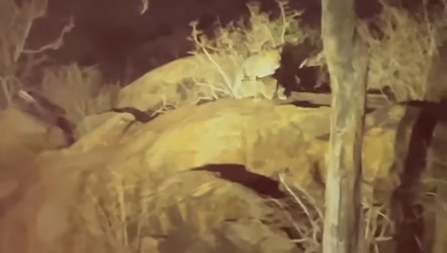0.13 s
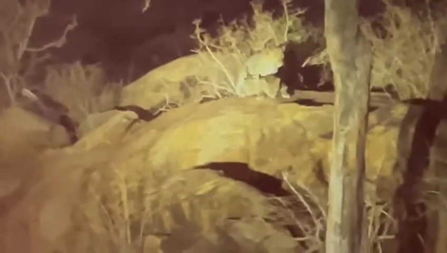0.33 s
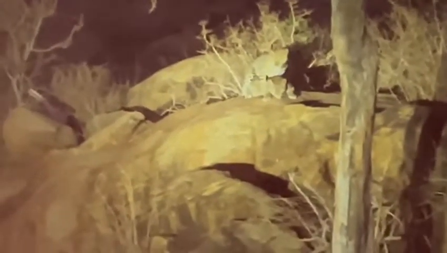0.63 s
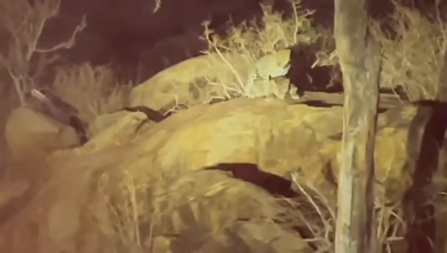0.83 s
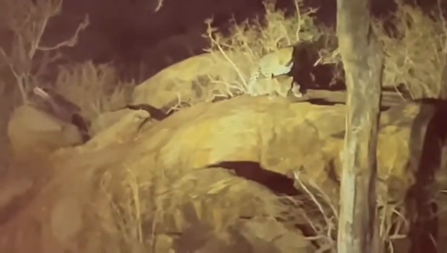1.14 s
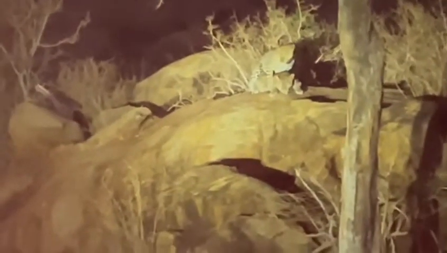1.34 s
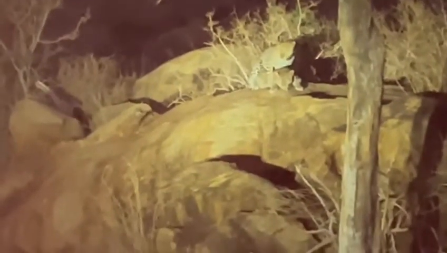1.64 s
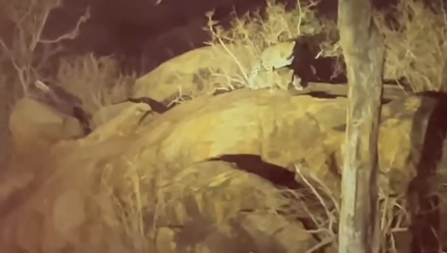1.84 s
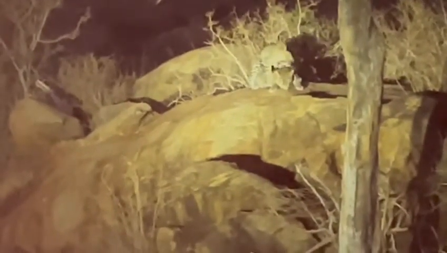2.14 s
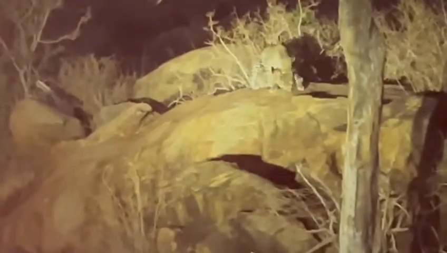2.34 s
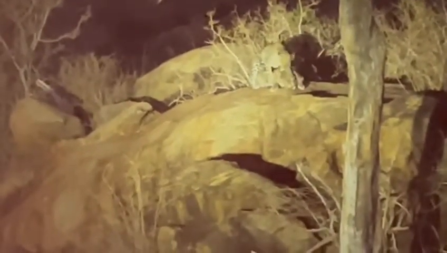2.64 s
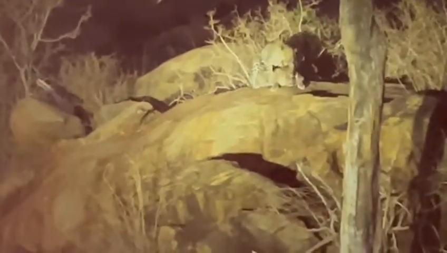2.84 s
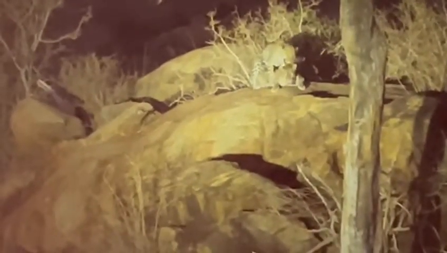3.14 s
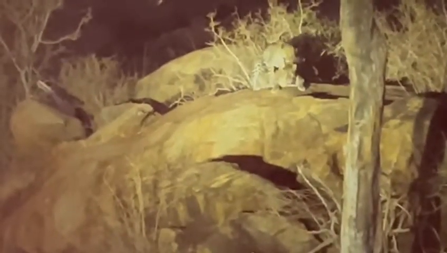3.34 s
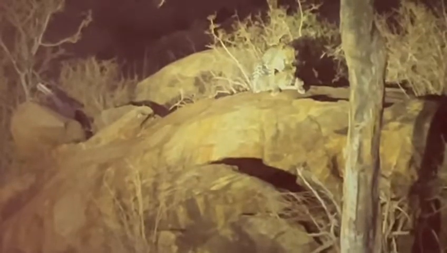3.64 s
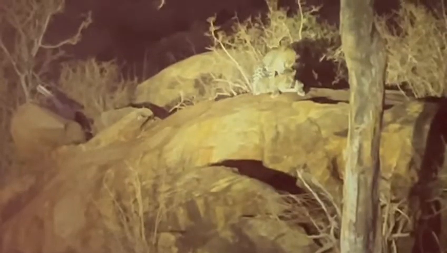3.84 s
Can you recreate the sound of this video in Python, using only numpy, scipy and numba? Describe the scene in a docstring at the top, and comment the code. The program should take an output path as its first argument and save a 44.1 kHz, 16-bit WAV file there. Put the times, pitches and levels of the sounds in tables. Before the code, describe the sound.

A big cat's low, rasping growl starts halfway through, over buffeting wind and soft night hiss.

```python
"""Night in the bush: wind buffets a hand-held camera microphone, a frog chorus throbs far off over soft hiss.
Wind is fluttering rumble plus short low noise bursts; frogs are pulsing noise bands, beside them a low murmur,
faint rustles and a whistled squeak. Halfway through a big cat some way off starts to growl: slow throat pulses
come in throbs and ring its mouth. At the top a thin band flickers on and off amid a wide hiss."""
import sys
import numpy as np
from scipy import signal
from scipy.fft import rfft, irfft
from scipy.io import wavfile
from scipy.ndimage import uniform_filter1d
from numba import njit

SR = 44100
rng = np.random.default_rng(int(sys.argv[2]) if len(sys.argv) > 2 else 0)


def bounce(signal):
    """Save signal as a 16-bit WAV file at the path given by the first command-line argument."""
    frames = np.transpose(np.atleast_2d(signal))
    limited = np.clip(frames, -1, 1)
    pcm = np.round(limited * 32767).astype(np.int16)
    wavfile.write(sys.argv[1], SR, pcm)


def boost(x):
    """Linear amplitude factor 10**(x/20) for a level x in decibels (scalar or array-like)."""
    u = np.asarray(x, float) / 20
    return 10 ** u


N = 176400
T = np.arange(N) / SR

# mouth of the cat: t/s, first resonance f/Hz, its resting width/Hz, mean pulse rate/Hz
MOUTH_SHAPE = [(2.19, 590, 55, 72), (2.24, 585, 65, 78), (2.32, 525, 72, 82), (2.45, 512, 75, 84),
               (2.53, 535, 70, 84), (2.64, 518, 78, 84), (2.74, 590, 70, 84), (2.9, 605, 65, 76),
               (3.2, 610, 65, 74), (3.4, 645, 55, 76), (3.7, 640, 60, 76), (4.0, 625, 62, 74)]


def unit(x):
    """Scale to rms 1."""
    return x / np.sqrt(np.mean(x ** 2) + 1e-18)


@njit
def svf(x, hz, width):
    """State-variable band-pass with moving centre and width, gain 1 at the centre."""
    y, b, l = np.empty(len(x)), 0., 0.
    for i in range(len(x)):
        g, k = np.tan(np.pi * hz[i] / SR), width[i] / hz[i]
        v = (b + g * (x[i] - l)) / (1 + g * (g + k))
        b, l, y[i] = 2 * v - b, l + 2 * g * v, k * v
    return y


def bandpass(x, hz, width_hz):
    """Band-pass with fixed or moving centre and width, gain 1 at the centre."""
    return svf(x, hz + 0 * T, width_hz + 0 * T)


def ring(x, hz, width_hz):
    """A resonance that answers a unit pulse with a unit swing."""
    return bandpass(x, hz, width_hz) * SR / (2 * np.pi * width_hz)


def cut(x, hz, kind, order=4):
    """Butterworth low or high pass."""
    return signal.sosfilt(signal.butter(order, hz, kind, fs=SR, output="sos"), x)


def band(hz, width_hz):
    """Noise through two equal resonances in a row, rms 1."""
    once = ring(rng.standard_normal(N), hz, width_hz)
    return unit(ring(once, hz, width_hz))


def along(table, column, x):
    """Read a table column by straight lines."""
    table = np.array(table, float)
    return np.interp(x, table[:, 0], table[:, column])


def shape(points):
    """dB at every FFT bin, by straight lines over log frequency."""
    points = np.array(points, float)
    bins_hz = np.arange(N // 2 + 1) * SR / N
    return np.interp(np.log(bins_hz + 1), np.log(points[:, 0]), points[:, 1])


def coloured(db):
    """Noise weighted by the given dB per bin."""
    return irfft(rfft(rng.standard_normal(N)) * boost(db), N)


def walk(rate):
    """Random levels held 1 / rate s and slewed twice; rms 1."""
    k = int(SR / rate)
    steps = np.repeat(rng.standard_normal(N // k + 1), k)
    return unit(uniform_filter1d(uniform_filter1d(steps, k), k)[:N])


def pair(mid, side):
    """Left and right from mid and side."""
    return np.array([mid + side, mid - side])


def flutter():
    """Wind rumble: low coloured noise follows the strength of the wind and flutters at random."""
    # wind strength: t/s, mean level/dB
    strength = [(0.0, -35.5), (0.6, -36.5), (0.76, -34.5), (0.99, -37.5), (1.66, -30.5), (1.82, -36.5),
                (2.02, -34.5), (2.7, -30.5), (3.12, -28), (3.39, -30.5), (3.69, -26.5), (4.0, -28)]
    # rumble spectrum: f/Hz, relative density/dB
    rumble = [(15, -60.5), (25, 6), (85, 6.5), (139, 1), (211, -2), (389, -8.5), (441, -21), (500, -12.5),
              (650, -9.5), (1100, -120)]
    return unit(coloured(shape(rumble))) * boost(along(strength, 1, T) + 3.54 * walk(18))


def buffet_bursts():
    """Buffets break on the microphone: each is a short low noise burst with an edge band that dies sooner."""
    # buffets: t/s, relative level/dB, edge against body/dB, time scale/s
    buffets = [(0.064, -25.5, -20, 0.065), (0.244, -15, -5, 0.041), (0.35, -14, -10.5, 0.04),
               (0.61, -20.5, -14, 0.066), (0.683, -6.5, -7.5, 0.021), (0.811, -24.5, -30, 0.036),
               (0.871, -20.5, -17, 0.024), (0.93, -26, -17, 0.05), (1.141, -18, 6, 0.056),
               (1.176, -12, 2, 0.038), (1.251, -8, -3, 0.04), (1.298, -20, -13, 0.058),
               (1.52, -21, -25, 0.026), (1.549, -19.5, -20, 0.025), (1.594, -19.5, -7, 0.03),
               (1.608, -12.5, -4.5, 0.022), (1.651, -15, -27, 0.02), (1.689, -12.5, -3.5, 0.032),
               (1.717, -19.5, -25, 0.043), (1.806, -19.5, 0, 0.038), (2.046, -23.5, -0.5, 0.029),
               (2.086, -18, -29, 0.019), (2.179, -22.5, -20, 0.043), (2.321, -16.5, -5.5, 0.036),
               (2.389, -17.5, -22, 0.027), (2.604, -9, -19, 0.027), (2.934, -11.5, -7.5, 0.049),
               (2.988, -9, -23, 0.031), (3.036, -12, -4, 0.031), (3.087, -16.5, 3, 0.039),
               (3.173, -10, -12, 0.022), (3.511, -15.5, -9, 0.039), (3.594, -7, -6, 0.025),
               (3.702, -9, -4.5, 0.026), (3.72, -8.5, -13, 0.055), (3.619, -9.5, -5.5, 0.023),
               (3.782, -21, 8.5, 0.039), (3.954, -28, 2, 0.031)]
    body, edge = np.zeros(N), np.zeros(N)
    for s, db, bright_db, scale in buffets:
        u = np.clip((T - s) / scale, 0, 30)
        bump = (u / .4 * np.exp(1 - u / 0.38)) ** 1.84
        body += boost(db - 7.5) * bump
        edge += boost(db - 7.5 + bright_db) * bump ** 2.1
    low = body * band(113.7, 159)
    bright = cut(band(347, 310), 620, "low", order=2)
    return low + edge * boost(1.46 * walk(70)) * bright


def wind():
    """Rumble and buffets in the middle; weaker, independent turbulence without the deepest bass at the sides."""
    mid = flutter() + buffet_bursts()
    side = boost(-5) * flutter() + boost(-12.5) * buffet_bursts()
    return pair(mid, cut(side, 85, "high", order=2))


def hiss():
    """Soft night air: steady coloured noise, with independent side noise for width."""
    # hiss spectrum: f/Hz, relative density/dB
    spectrum = [(180, -20), (300, 0.5), (462, -8), (644, -4.5), (1270, -11), (1870, -7.5), (2160, -12.5),
                (4130, -24), (5280, -27), (8620, -24), (9400, -29), (12200, -69), (20700, -120)]
    # stereo width: f/Hz, side against mid/dB
    width = [(300, -13), (1000, 1), (2050, -5), (2300, -31), (8300, -46), (20000, -53)]
    mid = coloured(shape(spectrum))
    gain = boost(-43) / np.std(mid)
    side = gain * coloured(shape(spectrum) + shape(width))
    return pair(gain * mid * boost(.6 * walk(25)), side)


def frogs():
    """Far-off chorus: wandering noise bands that pulse at the call rate."""
    # callers: f/Hz, width/Hz, pulse rate/Hz, nominal t of a pulse/s, relative level/dB
    callers = [(1784, 290, 28.97, .031, -51.5), (1921, 150, 28.97, .036, -52), (5230, 420, 30.8, .019, -67)]
    chorus = np.zeros(N)
    for hz, width_hz, rate, start, db in callers:
        phase = 2 * np.pi * rate * (T - start) + 0.1 * walk(7.85)
        beat = (0.56 + 0.3 * np.cos(phase)) ** 1.55
        call = band(hz * (1 + 0.021 * walk(9)), width_hz)
        chorus += call * beat * boost(db + 8 + 1.9 * walk(22))
    return pair(chorus, 0)


def murmur():
    """A low murmur: one narrow noise band of unsteady level."""
    return pair(band(645, 70) * boost(-57.5 + 1.5 * walk(12.6)), 0)


def flicker():
    """A thin noise band at the top wanders and shows only while a random gate is open."""
    gate = np.clip(4 * (walk(28) + .5), 0, 1)
    thin = band(11200 * (1 + .015 * walk(25)), 650)
    return pair(thin * boost(-70 + 4.0 * walk(5)) * gate, 0)


def sheen():
    """Wide top hiss: coloured noise of opposite sign left and right."""
    # sheen spectrum: f/Hz, relative density/dB
    spectrum = [(8700, -61), (9000, -14.5), (9500, -7), (10300, -3), (11000, -7), (11250, -24),
                (11600, -55.5)]
    return pair(0, boost(-60.5 + 1.0 * walk(10)) * unit(coloured(shape(spectrum))))


def rustles():
    """Faint rustles: broad noise bands that swell and fade over half a sine."""
    # rustles: t/s, length/s, f/Hz, width/Hz, level at the crest/dB
    strokes = [(0.617, 0.24, 4660, 3500, -52), (1.593, 0.16, 7540, 4500, -51),
               (1.62, 0.14, 3140, 1500, -50), (2.64, 0.21, 8750, 4000, -57), (2.978, 0.12, 8400, 3000, -53)]
    mid = np.zeros(N)
    for s, length, hz, width_hz, db in strokes:
        swell = np.sin(np.pi * np.clip((T - s) / length, 0, 1))
        mid += boost(db) * band(hz, width_hz) * swell
    return pair(mid, 0)


def squeak():
    """A faint whistled squeak: a gliding sine with a narrow band of air around it, a little to the left."""
    # glide: t/s, f/Hz, level of the tone/dB
    path = [(.648, 3000, -64), (.668, 3020, -54), (.69, 3280, -56), (.715, 3430, -53), (.74, 3380, -59),
            (.76, 3290, -53), (.795, 3100, -49), (.812, 3050, -64)]
    level = (T > path[0][0]) * (T < path[-1][0]) * boost(along(path, 2, T))
    glide = uniform_filter1d(along(path, 1, T), size=600)
    tone = np.sqrt(2) * np.sin(2 * np.pi * np.cumsum(glide) / SR)
    whistle = level * (tone + boost(1.5) * band(glide, 300))
    return pair(whistle, boost(-14) * whistle)


def throat_pulses():
    """Each throb restarts a run of up to eight uneven, fading pulses; returns throat and rasp pulse trains."""
    # throbs: t/s, relative rasp level/dB, relative throat level/dB, base fade per pulse/dB
    throbs = [(2.1945, -23, -23, -3.5), (2.2089, -26.5, -21, 1), (2.2692, -49, -25.5, 0),
              (2.3012, -46, -25, 2), (2.3406, -46, -27.5, -1), (2.3794, -34, -26, -1),
              (2.4409, -27, -20.5, 6), (2.4633, -35, -17.5, 1), (2.5024, -26, -19.5, 0.5),
              (2.5436, -26.5, -20.5, 3), (2.5794, -31, -19.5, 4), (2.6188, -28.5, -20, 5.5),
              (2.6604, -35, -22.5, 1), (2.6975, -22.5, -19, 1.5), (2.7351, -19.5, -17, 2.5),
              (2.7586, -20.5, -21, 2.5), (2.7824, -29.5, -26, -4.5), (2.8075, -17.5, -20, 0),
              (2.8195, -17.5, -21, 1.5), (2.8694, -18, -17, 7.5), (2.9068, -15.5, -15, 5.5),
              (2.9467, -15, -43, 2), (2.9961, -11.5, -15, 4.5), (3.035, -11.5, -15.5, 3),
              (3.0679, -12, -20.5, 2), (3.1168, -14.5, -20.5, 2), (3.1672, -26.5, -33.5, -5),
              (3.1974, -15, -22, 23), (3.2365, -17.5, -23.5, 5), (3.2665, -21.5, -25, 1),
              (3.2775, -20, -32, -5), (3.2864, -16.5, -28.5, 0), (3.3303, -18, -24, -1.5),
              (3.3568, -16.5, -17, 5.5), (3.3912, -16.5, -18, 2), (3.456, -20, -24.5, 2),
              (3.5054, -10.5, -17, 7), (3.5528, -19, -25.5, 4), (3.5793, -31, -22.5, 5),
              (3.6132, -17.5, -19.5, 5.5), (3.6651, -17.5, -20, 0.5), (3.7055, -22.5, -23, 1.5),
              (3.7449, -19.5, -25, 7), (3.7843, -20.5, -30, 0.5), (3.8531, -15, -18.5, 3.5),
              (3.917, -15, -18, 2.5), (3.9838, -16.5, -19, 2.5)]
    jitter, slip_cycles = .06, .12  # spread of the period (share), of the trigger (cycles of the ringing)
    throat, rasp = np.zeros(N), np.zeros(N)
    ends = [row[0] for row in throbs[1:]] + [N / SR]
    chance = rng.standard_normal((len(throbs), 8, 4))
    for (s, rasp_db, throat_db, fade_db), end, luck in zip(throbs, ends, chance):
        period, hz = 1 / along(MOUTH_SHAPE, 3, s), along(MOUTH_SHAPE, 1, s)
        for k, (late, low, high, slip) in enumerate(luck):
            if s > end - period / 2:
                break
            fall_db = fade_db * k + 5.5 * max(k - 2, 0) ** 2  # late pulses fade faster
            soft_db = -5 * (k == 0)  # the throat starts each throb softly
            throat[int(s * SR)] += boost(throat_db - fall_db + soft_db + 1.5 * low)
            rasp[int(s * SR)] += boost(rasp_db - fall_db + 2.0 * high)
            # the ringing throat triggers the next pulse roughly in step
            cycles = np.round(period * (1 + jitter * late) * hz)
            s += (cycles + slip_cycles * slip) / hz
    return throat, rasp


def airy(x, seconds, db):
    """Noise that follows every pulse and dies away."""
    puff = np.exp(-T[:SR // 8] / seconds)
    follow = signal.fftconvolve(x, puff)[:N]
    return boost(db) * follow * rng.standard_normal(N) / np.sqrt(np.sum(puff ** 2))


def mouth(throat):
    """Two moving resonances ring at the throat pulses; the first rings up slowly and chokes now and then."""
    # second resonance: t/s, f/Hz, relative level/dB
    second = [(2.19, 1310, -19.5), (2.33, 1020, -16), (2.5, 1017, -11.5), (2.62, 1113, -9),
              (2.74, 1060, -10), (2.9, 1004, -12), (3.4, 970, -15.5), (4.0, 1000, -11)]
    first_hz = along(MOUTH_SHAPE, 1, T) * (1 + .0125 * walk(40))
    choke = 1 + 1.2 * np.clip(walk(45), 0, 2)
    first_ring = ring(throat, first_hz, along(MOUTH_SHAPE, 2, T) * choke)
    low = bandpass(first_ring, first_hz, 115)  # the slow swell
    second_hz = along(second, 1, T)
    second_ring = bandpass(ring(throat, second_hz, 92), second_hz, 400)
    return low + boost(along(second, 2, T)) * second_ring


def snarl(rasp):
    """Lips drawn back: the rasp rings a bright edge that comes and goes."""
    # bright edge: t/s, relative level/dB
    edge = [(2.19, -13), (2.5, -12.5), (2.66, -4), (2.72, -5), (2.8, -6), (2.9, -13.5), (3.05, -19.5),
            (4.0, -13)]
    # its resonances: f/Hz, width/Hz, relative level/dB
    rings = [(2426, 440, 14), (2656, 400, 2.5), (3220, 480, -3.5)]
    bright = sum(boost(db) * bandpass(ring(rasp, hz, w), hz, w) for hz, w, db in rings)
    return boost(along(edge, 1, T)) * bright


def rasp_ring(rasp):
    """Rasp pulses ring unsteady upper resonances of alternating sign, leave some treble and feed the snarl."""
    # upper resonances: f/Hz, width/Hz, mean relative level/dB
    upper = [(1425, 134, -2), (1960, 192, -3), (2217, 146, -4)]
    high = np.zeros(N)
    for k, (hz, width_hz, db) in enumerate(upper):
        gain = (-1) ** k * boost(db + 1.16 * walk(60))
        high += gain * ring(rasp, hz * (1 + .025 * walk(50)), width_hz)
    high = cut(cut(high, 2700, "low", order=6), 1380, "high")
    spit = boost(-36) * ring(rasp, 5000, 5000)
    breathy = boost(-27) * ring(rasp, 3500, 900)
    return high + spit + breathy + snarl(rasp)


def echo(voice):
    """A short dull echo: decaying low-passed noise, independent for mid and side."""
    t60_s = .12
    tail = cut(rng.standard_normal((2, SR // 4)), 1090, "low") * boost(-60 * T[:SR // 4] / t60_s)
    tail = tail / np.sqrt(np.sum(tail[0] ** 2))
    mid, side = (signal.fftconvolve(voice, h)[:N] for h in tail)
    return pair(boost(-27) * mid, boost(-35.5) * side)


def growl():
    """The cat: throat pulses, puffs of air and breath ring the mouth; a short echo follows."""
    puff_s, breath_s = .0045, .012  # decay times
    throat, rasp = throat_pulses()
    throat = throat + airy(throat, puff_s, -8) + airy(throat, breath_s, -11)
    click = boost(-5) * rasp  # bare click of a pulse under its puff of air
    rasp = click + airy(rasp, puff_s, 3) + airy(rasp, breath_s, -12)
    voice = boost(8) * mouth(throat) + boost(-5.5) * rasp_ring(rasp)
    return pair(voice, 0) + echo(voice)


def scene():
    """Wind, night and cat together."""
    night = hiss() + frogs() + murmur() + rustles() + squeak()
    return wind() + night + growl()


def low_pass(x):
    """Removes everything above the highest recorded frequency."""
    return signal.sosfilt(signal.butter(12, 11870, fs=SR, output="sos"), x)


def record(dry):
    """The microphone loses the deepest bass and the top; flicker and sheen lie above the cut."""
    x = signal.sosfilt(signal.ellip(10, .3, 75, 9570, fs=SR, output="sos"), dry)  # steep low pass
    x = cut(x, 49, "high", order=3)
    x = x + flicker() + sheen()
    return low_pass(x)


dry = scene()
out = record(dry)
bounce(out)
```